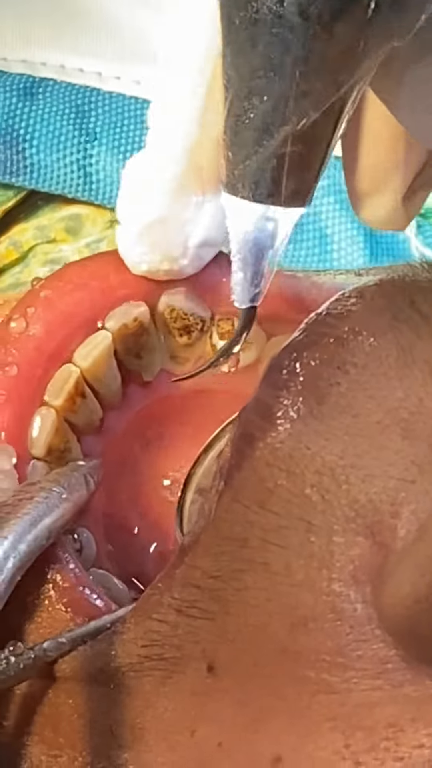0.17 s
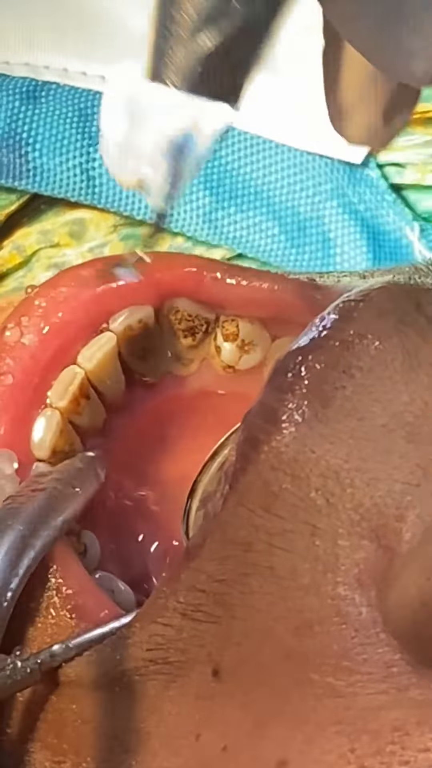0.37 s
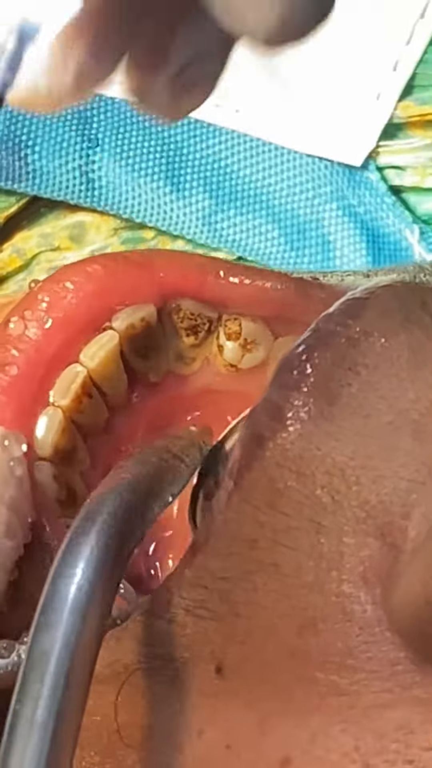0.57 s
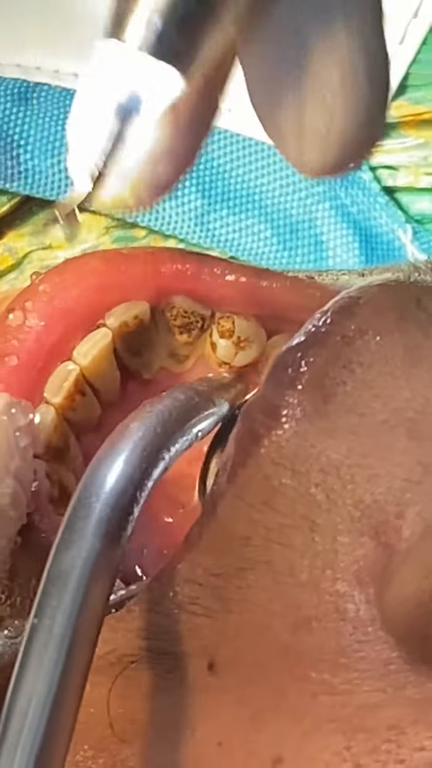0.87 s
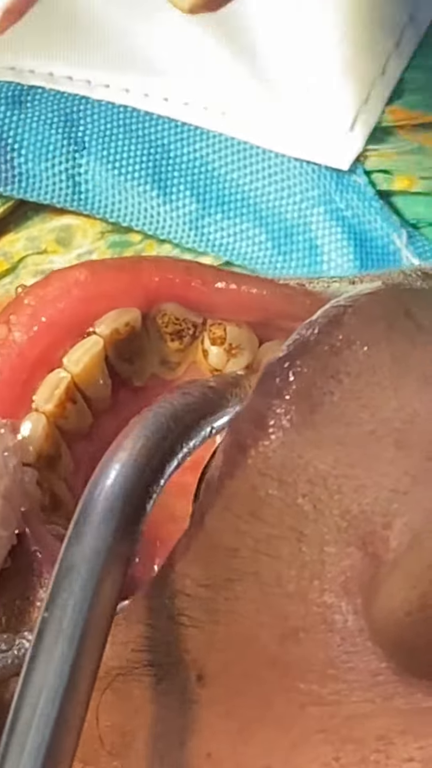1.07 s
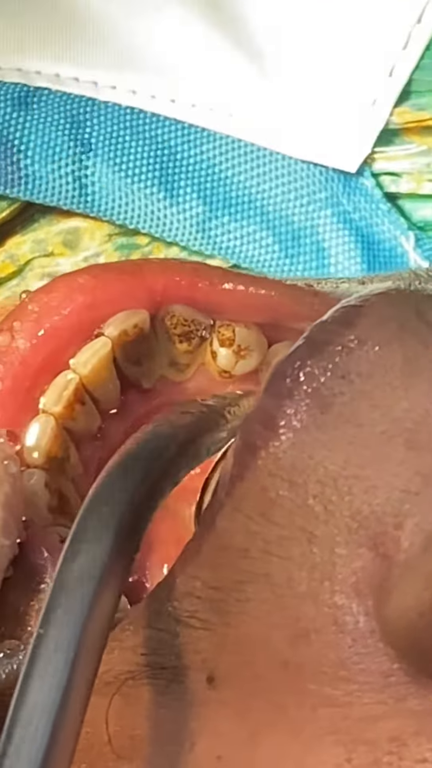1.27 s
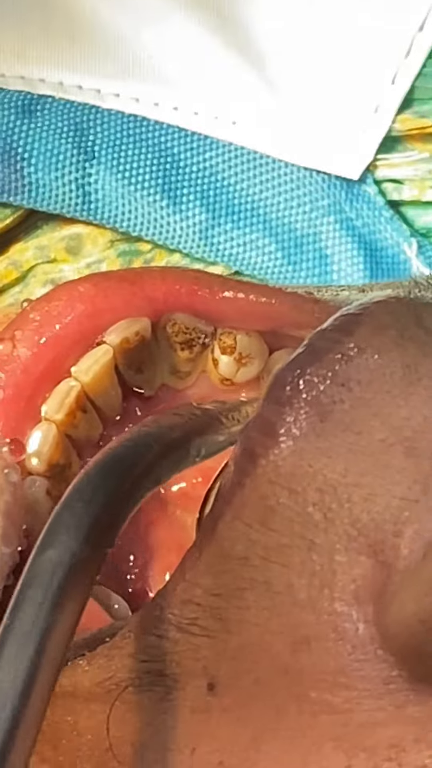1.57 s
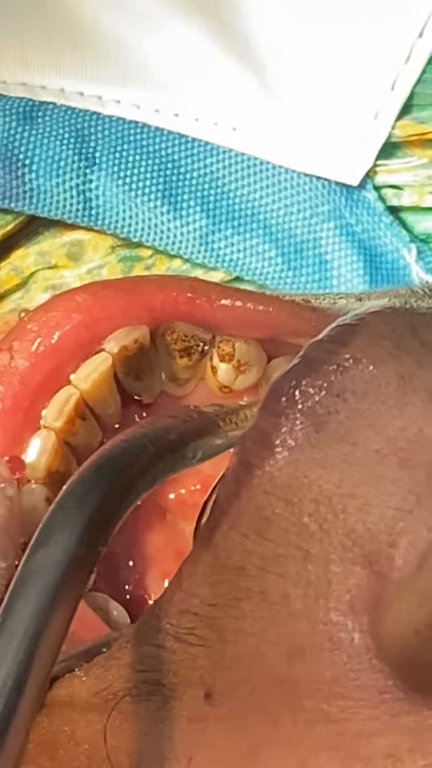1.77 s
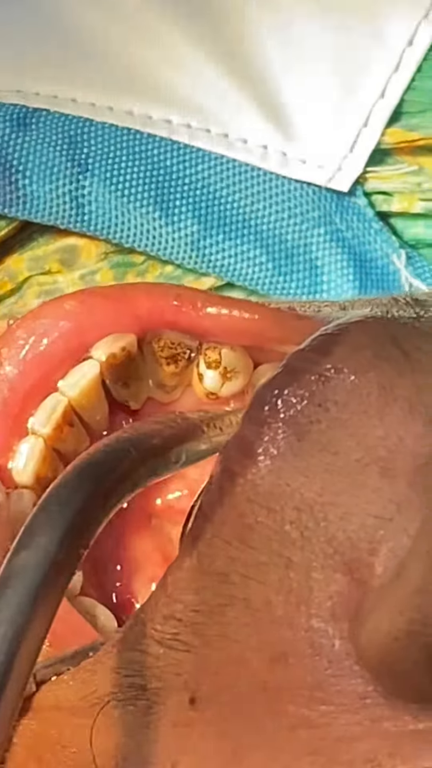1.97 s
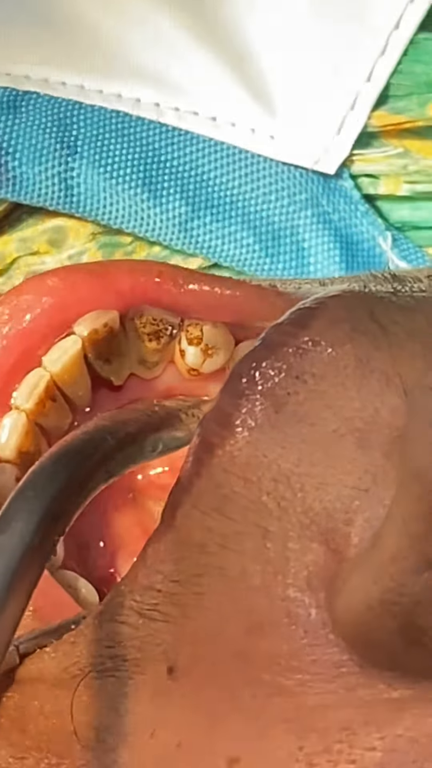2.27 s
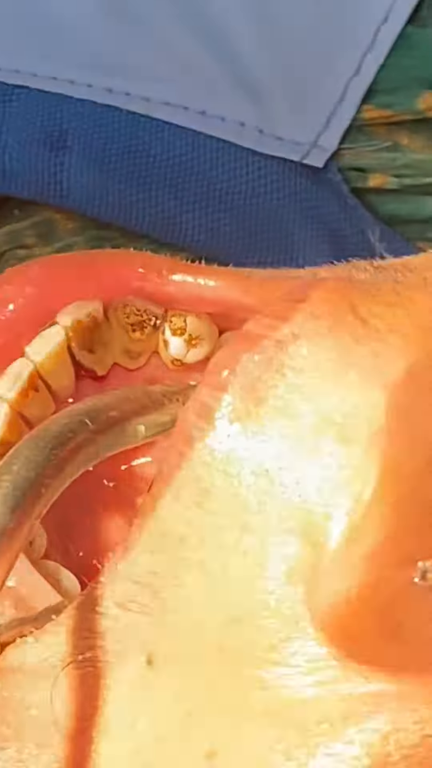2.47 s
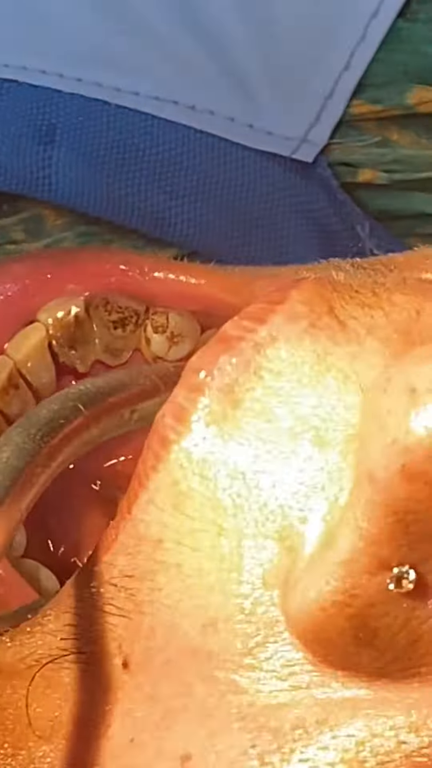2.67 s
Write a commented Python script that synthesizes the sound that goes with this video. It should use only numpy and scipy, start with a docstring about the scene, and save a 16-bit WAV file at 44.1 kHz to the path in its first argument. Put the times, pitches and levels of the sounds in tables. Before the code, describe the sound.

Dental suction tip hisses and spits wetly in an open mouth, then settles to a steadier hiss

```python
"""A dental suction tip works in an open mouth, close to a phone: a bright jet hisses at the tip, as noise with
uneven gain, and spits when it meets water, as decaying impulses; the tip seals briefly near the end.
Turbulence rings mouth and tube resonances, with brief narrow whistles. A pump hums as stroke harmonics,
a far engine drones as orders of its firing rate, and the room adds diffuse air noise.
Two microphone ports hear the tip a moment apart."""
import sys
import numpy as np
from scipy import signal
from scipy.fft import rfft, irfft, next_fast_len
from scipy.io import wavfile
from scipy.ndimage import uniform_filter1d, map_coordinates

SR = 44100
rng = np.random.default_rng(int(sys.argv[2]) if len(sys.argv) > 2 else 0)


def gain_from_db(level_db):
    """Convert decibel levels to linear amplitude factors (20 dB per decade)."""
    decades = np.asarray(level_db, float) / 20
    return 10 ** decades


def wav_out(sig):
    """Save sig, one row per channel (or a flat mono array), as 16-bit PCM at SR to the path in sys.argv[1]."""
    wavfile.write(sys.argv[1], SR, np.round(np.clip(np.atleast_2d(sig).T, -1, 1) * 32767).astype(np.int16))


N = 124803


def unit(x):
    """Normalisation: scales a signal to a root-mean-square value of 1."""
    return x / np.sqrt(np.mean(x ** 2) + 1e-20)


def along(points, hz):
    """Interpolation of (frequency, value) points on a logarithmic frequency axis."""
    f, v = np.transpose(points)
    return np.interp(np.log(hz + 1), np.log(f + 1), v)


def curves(rows):
    """Linear interpolation in time: one value per sample for each column after the time."""
    s, *cols = np.transpose(rows)
    return [np.interp(np.arange(N) / SR, s, c) for c in cols]


def wobble(rate):
    """Slow random fluctuation: a spline through Gaussian knots, rate knots a second."""
    knots = rng.standard_normal(int(N * rate / SR) + 4)
    return map_coordinates(knots, [np.arange(N) * rate / SR])


def filtered(x, response):
    """Linear filtering: the spectrum is multiplied by a complex response of frequency."""
    m = next_fast_len(N + SR // 2)
    return irfft(rfft(x, m) * response(np.fft.rfftfreq(m, 1 / SR)), m)[..., :N]


def resonance(f, hz, width_hz):
    """Response of a damped second-order resonator, causal and of peak gain 1."""
    return 1j * f * width_hz / (hz * hz - f * f + 1j * f * width_hz)


def resonances(modes):
    """Modal superposition: a response summed over squared resonances (Hz, width Hz, dB)."""
    return lambda f: sum(gain_from_db(db) * resonance(f, hz, width) ** 2 for hz, width, db in modes)


def patchy(patchy_db):
    """Non-stationary turbulence: white noise with patches of random gain in time and frequency."""
    z = signal.stft(rng.standard_normal(N), nperseg=512)[2]
    field = uniform_filter1d(rng.standard_normal(z.shape), size=8, axis=0)
    field = uniform_filter1d(field, size=10, axis=1)
    return signal.istft(z * gain_from_db(patchy_db * unit(field)), nperseg=512)[1][:N]


def room():
    """Diffuse field: mid and side noise mixed to a coherence that is high in the bass and dips in the mids."""
    # spectrum of the room air: pitch_hz, relative level_db
    air_colour = [(25, -9), (60, -5), (170, 6), (400, -5), (1000, -9.5), (2200, -33.5), (4500, -44)]
    # likeness of the two ports: pitch_hz, coherence (1 = identical)
    air_alike = [(150, .999), (300, 0.98), (900, 0.52), (2200, 1)]
    air_db = -35.5  # rms

    def mid_side_response(f):
        angle = np.arccos(np.clip(along(air_alike, f), -1, 1)) / 2
        return gain_from_db(along(air_colour, f)) * [np.cos(angle), np.sin(angle)]

    noise = np.array([patchy(patchy_db=1.5), patchy(patchy_db=1.5)])
    mid, side = filtered(noise, mid_side_response)
    return gain_from_db(air_db) * unit(np.array([mid + side, mid - side]))


def pump():
    """Periodic excitation: harmonics of the pump's stroke rate and mains hum, each drifting in level."""
    # pump strokes: multiple of the stroke rate, rms level_db before drift
    strokes_table = [(3, -40.5), (6, -38), (8, -46), (13, -52), (15, -50), (17, -47.5), (18, -48.5),
                     (20, -51.5), (22, -48.5), (30, -60.5)]
    # mains hum: pitch_hz, rms level_db before drift
    mains = (100, -36.5)
    stroke_hz = 24.62
    t = np.arange(N) / SR

    def tone(db, hz):
        start_phase = 2 * np.pi * rng.random()
        return np.sqrt(2) * gain_from_db(db) * np.sin(start_phase + 2 * np.pi * hz * t)

    strokes = sum(tone(db + 1.64 * wobble(3.855), k * stroke_hz) for k, db in strokes_table)
    mains_hz, mains_db = mains
    hum = tone(mains_db + 1.1 * wobble(4.75), mains_hz)
    return strokes + hum


def engine():
    """Phase-locked orders: the second drones throughout, higher orders join in step when it labours."""
    # far engine: time_s, firing rate_hz, rms level_db of its lowest tone before drift
    drone_course = [(.4, 36.46, -39), (.75, 36.1, -43), (.95, 33.8, -33.5), (1.35, 33.94, -37),
                    (1.6, 37.55, -36), (2.18, 37.25, -50), (2.25, 35.75, -31), (2.4, 32, -35.5),
                    (2.6, 32.57, -33.5), (2.83, 34.74, -30.5)]
    # throb while it labours: time_s, level_db to which the orders are relative
    throb_course = [(2.2, -64), (2.27, -31), (2.55, -34), (2.83, -38.5)]
    # orders in the throb: multiple of the firing rate, relative level_db
    orders = [(3, -1), (4, -2), (5, -14)]
    firing_hz, level_db = curves(drone_course)
    throb_db, = curves(throb_course)
    phase = 2 * np.pi * (np.cumsum(firing_hz) / SR + rng.random())
    drone = gain_from_db(level_db + 1.0 * wobble(8.37)) * np.cos(2 * phase)
    throb = sum(gain_from_db(db + 0.97 * wobble(7.95)) * np.cos(k * phase) for k, db in orders)
    return np.sqrt(2) * (drone + gain_from_db(throb_db) * throb)


def mouth():
    """Cavity resonance: turbulence rings the mouth, whose pitch wanders as the tip shifts."""
    # air drawn through the mouth: time_s, level_db before flutter
    draw = [(0, -33), (.42, -30.5), (.72, -32), (1.07, -34), (1.18, -30), (1.3, -38.5), (1.6, -33.5),
            (2.3, -31), (2.58, -29), (2.7, -29), (2.715, -45.5), (2.79, -36.5), (2.83, -30.5)]
    # mouth cavity: pitch_hz, width_hz, relative level_db
    cavity = [(1343, 244, -1.5), (1458.5, 296, -1.5)]
    # narrow whistles while the tip slides into the cheek: centre_s, pitch_hz, level_db at the centre
    whistle_events = [(.77, 1316, -25.5), (.85, 1430, -30.5), (.94, 1403, -23), (1.028, 1480, -31)]
    wander_hz = 39.62  # scale of the random frequency shift
    whistle_s, whistle_width_hz = 0.021, 104  # standard deviation of the swell, resonance width

    level_db, = curves(draw)
    band = unit(filtered(patchy(patchy_db=1.0), resonances(cavity)))
    # single-sideband frequency shift by the integrated wander
    shift = np.exp(2j * np.pi * np.cumsum(wander_hz * wobble(5)) / SR)
    shifted = (signal.hilbert(band) * shift).real
    t = np.arange(N) / SR
    whistles = np.zeros(N)
    for s, hz, db in whistle_events:
        swell = np.exp(-.5 * ((t - s) / whistle_s) ** 2)
        ring = filtered(rng.standard_normal(N), lambda f: resonance(f, hz, whistle_width_hz) ** 2)
        whistles += gain_from_db(db) * swell * unit(ring)
    return gain_from_db(level_db + 1.2 * wobble(24.6)) * shifted + whistles


def tip():
    """Jet noise and impulsive excitation: air hisses and rings the tube, droplets and spits crack."""
    # jet at the tip: time_s, level_db
    jet = [(0, -33), (.32, -32.5), (.448, -37), (.456, -27), (.52, -28.5), (.535, -35), (.684, -37),
           (.69, -29), (.83, -35.5), (.845, -27.5), (.98, -30), (1.06, -27), (1.26, -25.5), (1.38, -29),
           (1.64, -26), (1.74, -31), (2.06, -29.5), (2.3, -30.5), (2.34, -25), (2.43, -35), (2.51, -29.5),
           (2.58, -33.5), (2.7, -40.5), (2.712, -63), (2.775, -49), (2.83, -40)]
    # tube resonances: pitch_hz, width_hz, relative level_db
    tube_modes = [(3389, 583, 2), (4798, 130, -5)]
    # loud spits of water: start_s, level_db before the pop gain and the jet colour
    spit_events = [(.1368, -16), (.2529, -17), (.2717, -17), (.2902, -19), (.3179, -17), (.3895, -14),
                   (.4109, -17), (.4579, -14), (.5443, -14), (.5527, -13), (.5614, -14), (.5674, -16),
                   (.5804, -12), (.5975, -21), (.6745, -18), (.6878, -16), (.7087, -15)]
    # spectrum of the jet at the front: pitch_hz, relative density_db
    front_colour = [(1800, -30), (2700, -5), (5300, -8), (6000, -5), (6700, -12), (7700, -1), (8600, -7),
                    (10400, -1), (12600, -7), (13400, -3), (14500, -9)]
    # spectrum of the jet deep in the cheek: pitch_hz, relative density_db
    deep_colour = [(2000, -26), (4300, -9), (5600, -5), (7300, -3), (8500, -12), (9400, 0), (10900, -10),
                   (12000, -3), (12800, -11), (13500, -2), (15100, -12)]
    move_start_s, move_s = 0.764, 0.32  # from the pool at the front to deep in the cheek
    wet_front, wet_deep = .45, .12  # power share of droplet spray
    droplets_per_s, droplet_t60_s, spit_t60_s = 300, 0.0029, .016
    pop_db, fizz_db = 16, -19  # pop gain before the jet colour dulls it; fizz relative to the pop
    tube_level_db, tube_follows, tube_deep_db = -36.5, 0.57, -3  # tube_follows: dB per dB of the jet

    level_db, = curves(jet)
    deep = np.clip((np.arange(N) / SR - move_start_s) / move_s, 0, 1)
    wet = np.clip(wet_front + (wet_deep - wet_front) * deep, 0, 1)
    t = np.arange(SR // 30) / SR

    def decaying_noise(impulses, t60_s):
        envelope = signal.fftconvolve(impulses, gain_from_db(-60 * t / t60_s))[:N]
        return envelope * rng.standard_normal(N)

    air = patchy(patchy_db=2.5) * gain_from_db(0.68 * wobble(40.23))
    chance = rng.random((2, N))
    # random droplet times, most of them weak and a few strong
    drops = (chance[0] < droplets_per_s / SR) * gain_from_db(-3.5 * np.log(chance[1] + .1))
    spray = unit(decaying_noise(drops, droplet_t60_s))
    flow = np.sqrt(1 - wet) * unit(air) + np.sqrt(wet) * spray
    front, cheek = (unit(filtered(flow, lambda f: gain_from_db(along(c, f)))) for c in (front_colour, deep_colour))
    hiss = gain_from_db(level_db) * ((1 - deep) * front + deep * cheek)

    pops = np.zeros(N)
    for s, db in spit_events:
        pops[round(s * SR)] = gain_from_db(db + pop_db)
    spits = pops + gain_from_db(fizz_db) * decaying_noise(pops, spit_t60_s)
    coloured_spits = filtered(spits, lambda f: gain_from_db(along(front_colour, f)))

    tube_db = tube_level_db + tube_follows * (level_db - level_db.mean()) + tube_deep_db * deep
    tube = gain_from_db(tube_db) * unit(filtered(patchy(patchy_db=1.2), resonances(tube_modes)))
    return hiss + coloured_spits + tube


def ports(x):
    """Arrival differences: a phase lead and imbalance, plus a diffuse part that differs between channels."""
    # lead between the ports: pitch_hz, left minus right phase_rad
    lead = [(800, 0), (1100, -.3), (1500, .1), (2300, 0), (3200, .5), (4000, .15), (5000, 2.1), (5500, 1.7),
            (8500, 3.14), (11000, 3.14), (15700, 5.3)]
    # imbalance: pitch_hz, left minus right level_db
    left_dip = [(900, 6.5), (1200, -9), (1550, 1.5)]
    # diffuse part of the source's sound, differing between the channels: pitch_hz, level_db
    diffuse_colour = [(2300, -32), (4300, -12), (7800, -11), (8600, -35), (10900, -35), (12300, -11)]

    def half(f):
        """Half of the difference, given to the left and taken from the right."""
        return gain_from_db(along(left_dip, f) / 2) * np.exp(.5j * along(lead, f))

    direct = filtered(x, lambda f: np.array([half(f), 1 / half(f)]))
    t = np.arange(SR // 10) / SR
    tail = rng.standard_normal((2, len(t))) * gain_from_db(-60 * t / .045)  # 60 dB decay in 45 ms
    diffuse = signal.fftconvolve(x[None], tail / np.linalg.norm(tail[0]), axes=1)[:, :N]
    return direct + filtered(diffuse, lambda f: gain_from_db(along(diffuse_colour, f)))


def scene():
    """Superposition: tip and mouth near the phone, with pump, engine and room around them."""
    return ports(mouth() + tip()) + pump() + engine() + room()


def top_cut(x):
    """Nothing passes above the cut-off."""
    return signal.sosfilt(signal.butter(12, 15870, fs=SR, output="sos"), x)


def record(dry):
    """Transduction: the phone keeps nothing above its band limit near 15.8 kHz and stores the two port signals."""
    return top_cut(dry)


dry = scene()
out = record(dry)
wav_out(out)
```